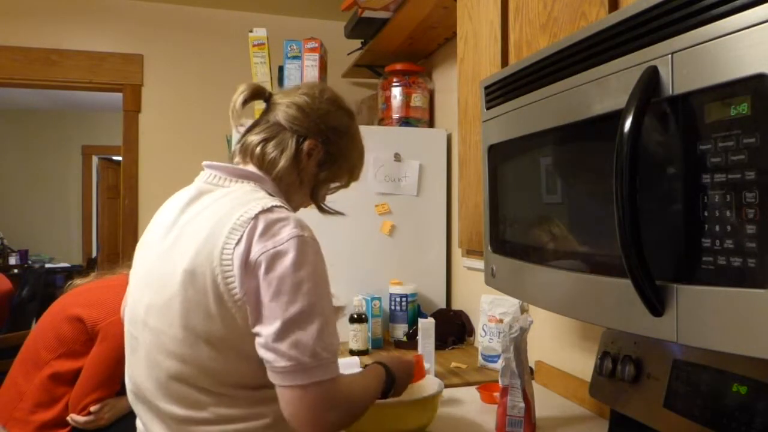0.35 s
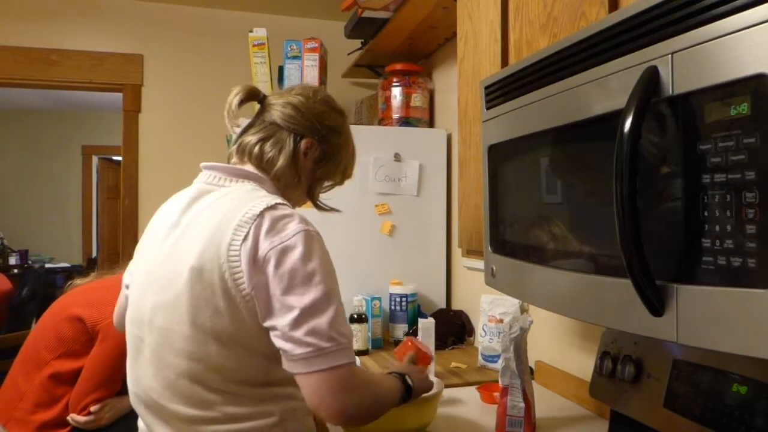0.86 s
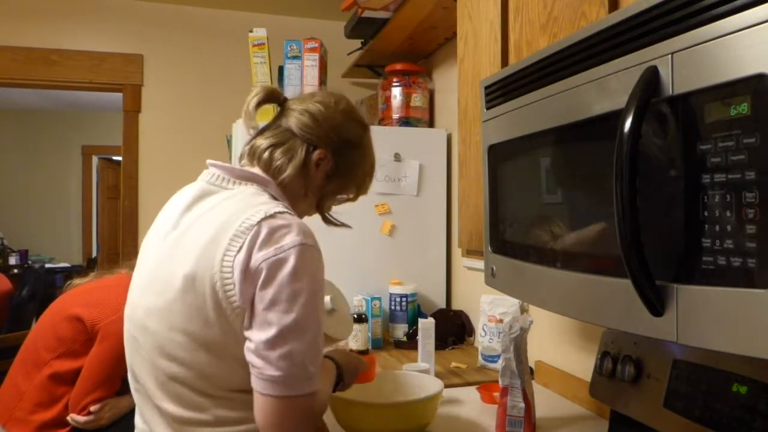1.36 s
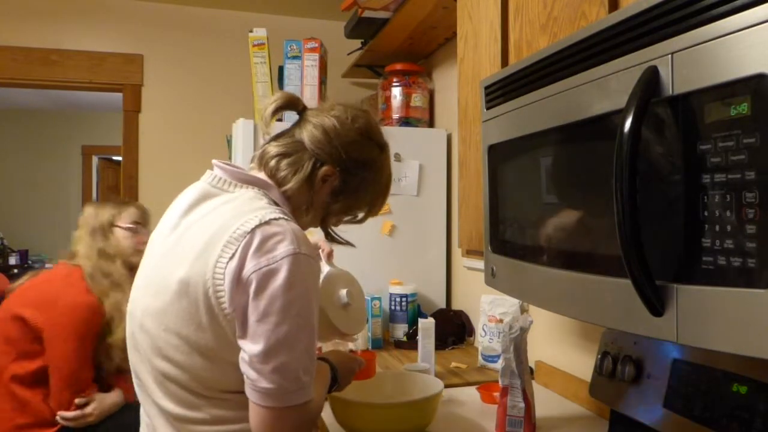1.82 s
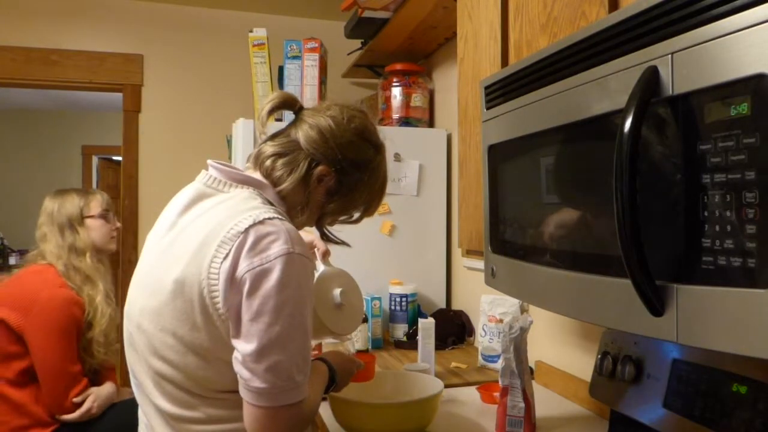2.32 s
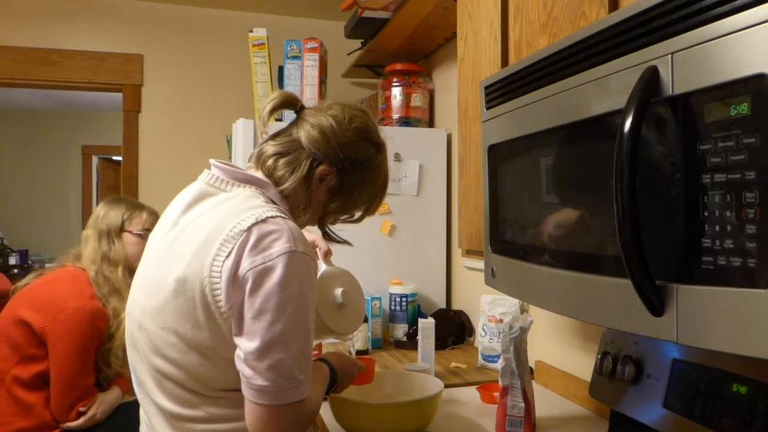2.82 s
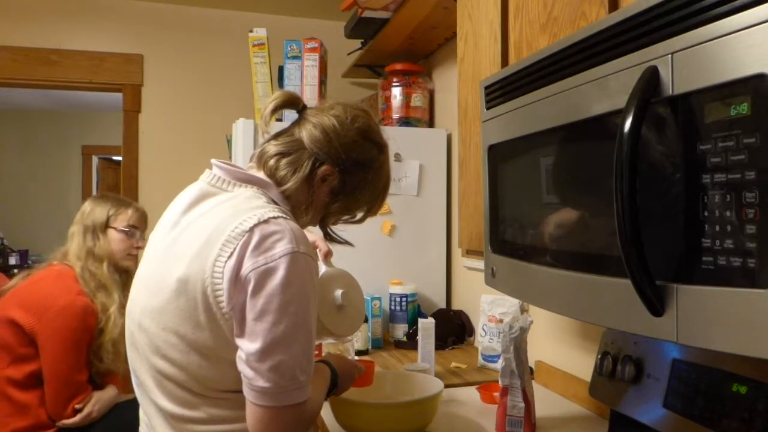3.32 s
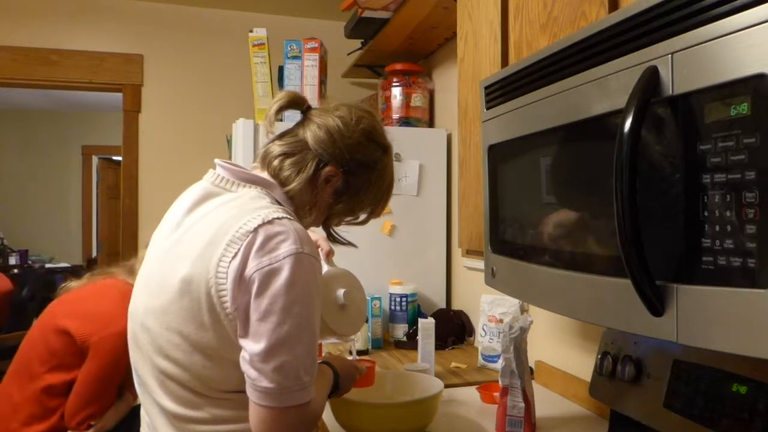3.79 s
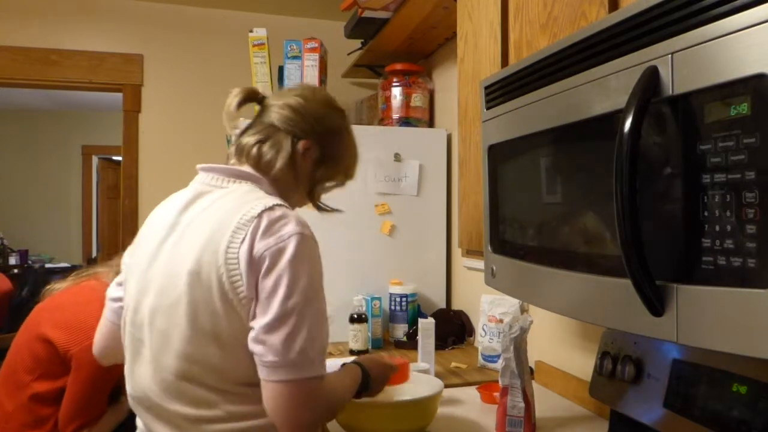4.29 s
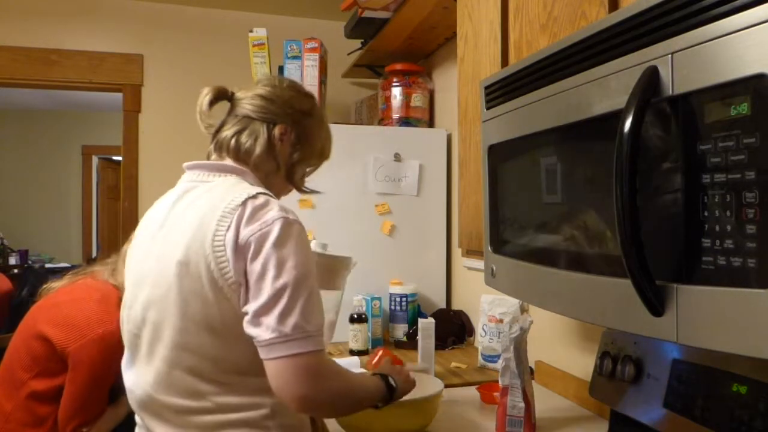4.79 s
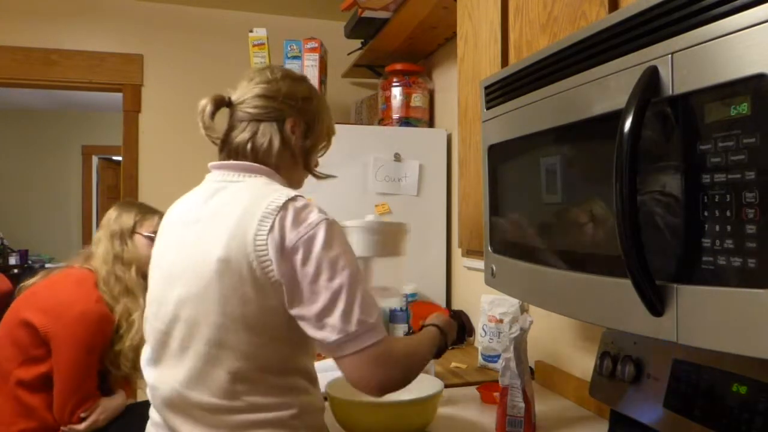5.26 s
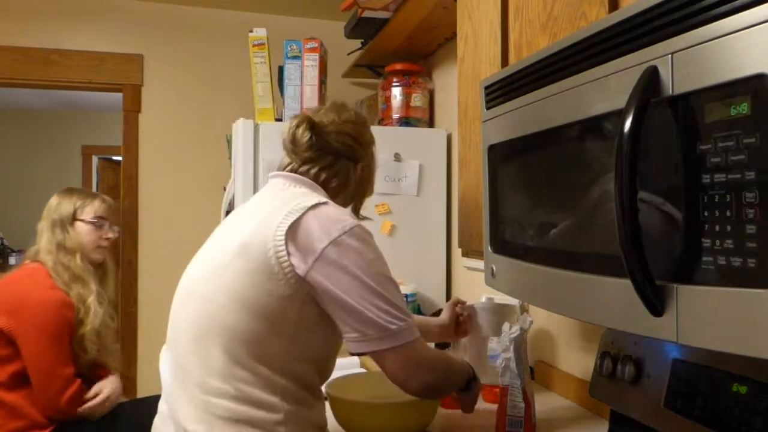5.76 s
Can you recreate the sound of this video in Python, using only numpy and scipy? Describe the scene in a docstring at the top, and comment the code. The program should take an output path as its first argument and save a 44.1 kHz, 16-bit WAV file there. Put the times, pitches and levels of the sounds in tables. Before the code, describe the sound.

Small, delicate water sounds close to the microphone in a small kitchen: bright tiny bubbles, fizzing drips, a little low slosh. A brief pour ends with quick hard cup taps, a thin trickle resumes among soft low thuds, and a second brief pour splashes brightly. After a near-quiet pause, hard hollow plastic clacks and a snap stand out as the loudest event, trailing rattle and a faint settling rumble.

```python
"""A thin trickle of water over a quiet kitchen's hush: from a plastic pitcher into a small cup, tipped twice into a bowl.
Water is crowds of chirping bubbles, fizzing spray, low slosh, splash bursts and breathy gurgles on gliding tones.
The counter thuds, the cup taps the bowl, the pitcher clacks into its stand, lid snapping: ringing modes plus rattle.
A dull rumble follows as the pitcher settles; sparse decaying echoes make the room."""
import sys
import numpy as np
from scipy import signal
from scipy.fft import rfft, irfft
from scipy.io import wavfile
from scipy.ndimage import uniform_filter1d

SR = 44100
rng = np.random.default_rng(int(sys.argv[2]) if len(sys.argv) > 2 else 0)


def to_wav(sig):
    """Store sig (one row per channel, or 1-D mono) as 16-bit WAV at the path in sys.argv[1].

    Samples outside -1..1 are clipped; the rate is SR.
    """
    pcm = np.clip(np.atleast_2d(sig), -1, 1) * 32767
    pcm = np.round(pcm).astype(np.int16)
    wavfile.write(sys.argv[1], SR, pcm.T)  # frames by channels


def gain_from_db(level_db):
    """Convert decibel levels to linear amplitude factors (20 dB per decade)."""
    decades = np.asarray(level_db, float) / 20
    return 10 ** decades


N = 270288

# kitchen hush, colour: pitch_hz, relative density_db (per Hz)
AIR_COLOUR = [(15, -40), (25, -28.5), (157, -23), (229, -15.5), (516, -6.5), (775, -8), (3920, -17.5),
              (6740, -25), (16000, -32)]
# left-right likeness of the hush: pitch_hz, correlation (-1 to 1)
AIR_LIKENESS = [(60, -0.17), (240, 0.88), (950, -0.14), (3770, -0.85), (15000, -0.37)]
# strength of the trickle: time_s, level_db
FLOW = [(0, -63.5), (1.0, -60), (1.5, -67), (1.97, -66.5), (2.25, -57.5), (2.5, -54), (2.7, -62.5),
        (3.2, -59.5), (3.95, -63.5), (5.2, -69), (5.5, -62), (6.13, -66.5)]
# surges of water landing: start_s, hold_s, level_db
SURGES = [(.49, 0.17, -57), (.615, 0.026, -52.5), (.70, 0.093, -51.5), (.766, 0.055, -46),
          (.848, 0.03, -45.5), (3.13, 0.0076, -53.5), (3.36, 0.016, -57), (3.65, 0.03, -55.5),
          (4.09, 0.012, -55.5), (4.556, 0.12, -50), (4.68, 0.12, -47.5), (4.797, 0.1, -45.5),
          (4.99, 0.067, -59), (6.04, 0.032, -54.5)]
# colour of the spray: pitch_hz, relative density_db (per Hz)
SPRAY_COLOUR = [(1180, -74), (2000, -11), (2740, -10.5), (6420, -7.5), (14200, -14), (16000, -23.5)]
# swells of the slosh in the vessels: start_s, hold_s, level_db
SLOSH_SWELLS = [(.77, 0.022, -47.5), (.92, 0.023, -52.5), (2.2, 0.061, -53), (2.55, 0.042, -56.5),
                (4.79, 0.066, -59), (5.02, 0.15, -59.5), (5.9, 0.081, -51.5)]
# colour of the slosh: pitch_hz, relative density_db (per Hz)
SLOSH_COLOUR = [(100, -11.5), (300, -12), (700, 5.5), (1500, -3.5), (3000, -12.5)]
# splashes, each a burst of bubbles: start_s, peak_db, pitch_hz
SPLASHES = [(0.0524, -35, 8260), (0.065, -37, 5800), (0.251, -36.5, 740), (0.6175, -32.5, 6150),
            (0.738, -35, 3520), (0.7683, -35.5, 9180), (0.783, -36.5, 7460), (0.8483, -33.5, 6080),
            (0.872, -37, 5540), (1.734, -50.5, 2020), (1.917, -44, 4500), (2.12, -42, 14800),
            (2.1814, -40, 6680), (2.209, -42, 11700), (2.37, -45, 6140), (2.405, -38.5, 6570),
            (2.533, -36.5, 3620), (2.6384, -45, 7400), (2.974, -44, 10900), (3.1306, -45.5, 4860),
            (3.1734, -40.5, 4310), (3.5745, -40.5, 5930), (3.9893, -49.5, 7540), (4.114, -44, 7840),
            (4.312, -42.5, 14750), (4.542, -33, 10900), (4.559, -41, 4370), (4.657, -35.5, 10400),
            (4.6927, -28.5, 6500), (4.706, -31.5, 7370), (4.762, -38, 6330), (4.79, -32.5, 3450),
            (4.802, -33, 2196), (4.823, -29.5, 5200), (4.912, -38, 3920), (4.993, -45.5, 4680)]
# singing hollows dug by the jet: start_s, length_s, midway level_db, first_hz, last_hz
GURGLES = [(0.487, 0.14, -52, 6600, 5090), (2.753, 0.16, -59.5, 2765, 2338),
           (4.656, 0.101, -49.5, 1450, 1750), (4.829, 0.059, -48, 1527, 1528)]
# blows on the counter: start_s, peak_db, ring_over_rattle_db
THUDS = [(0.745, -40.5, 4), (2.014, -38.5, 3), (2.446, -37, 5), (2.9105, -33.5, -5), (2.9155, -25, -8.5),
         (2.939, -34, -31), (2.956, -37.5, -17), (3.365, -44.5, -3.5), (5.461, -34.5, -25)]
# modes of the counter: pitch_hz, relative level_db, t60_s
COUNTER_MODES = [(309.5, -12.5, 0.13), (457, 3.5, 0.07)]
# colour of the counter's rattle: pitch_hz, relative density_db (per Hz)
COUNTER_RATTLE = [(88, -61.5), (150, -24.5), (805, -3.5), (1630, -15), (2400, -25), (3840, -21),
                  (16000, -33.5)]
# cup against bowl: start_s, peak_db, ring_over_rattle_db
CUP_TAPS = [(0.962, -30.5, -3), (1.0655, -16, 1.5), (1.0805, -24, 7), (1.088, -24, 9)]
# modes of the cup: pitch_hz, relative level_db, t60_s
CUP_MODES = [(890, -11, 0.029), (1250, -5.5, 0.022), (1490, -1.5, 0.026), (1987, -5, 0.055),
             (2224, -3, 0.026)]
# colour of the cup's rattle: pitch_hz, relative density_db (per Hz)
CUP_RATTLE = [(180, -62), (450, -30), (870, -7.5), (2000, -3.5), (2610, -24.5), (3900, -23.5), (5000, -49),
              (6400, -30), (12700, -17.5), (16000, -31)]
# strength of the ringing air in the filling cup: time_s, level_db
FILLING = [(2.0, -65.5), (2.4, -65.5), (2.9, -61), (3.6, -89)]
# resonances of the air in the cup: pitch_hz, width_hz, relative level_db
CUP_AIR = [(3450, 270, 2.5), (4500, 98, -1.5), (6150, 440, -0.5)]
# pitcher against its stand: start_s, peak_db, ring_over_rattle_db
CLACKS = [(5.742, -22.5, -8), (5.7705, -7.5, 2), (5.7765, -9, 3), (5.794, -28, 4), (5.9965, -35, -13)]
# modes of the pitcher: pitch_hz, relative level_db, t60_s
PITCHER_MODES = [(1043, -12.5, 0.38), (1520, -1, 0.076), (2716, 2, 0.1), (3270, 11, 0.059),
                 (3665, 8.5, 0.03), (6130, -0.5, 0.043)]
# colour of the pitcher's rattle: pitch_hz, relative density_db (per Hz)
PITCHER_RATTLE = [(130, -38), (560, -1.5), (1020, -14), (1530, -3), (1760, -13.5), (3400, 1), (4410, -9.5),
                  (6510, -9), (16000, -22)]
# snaps of the lid: start_s, peak_db, ring_over_rattle_db
LID_SNAPS = [(5.76, -15.5, 1), (5.88, -13.5, 9)]
# the lid's one short mode: pitch_hz, relative level_db, t60_s
LID_MODES = [(3530, 0, .011)]
# colour of the lid's rattle: pitch_hz, relative density_db (per Hz)
LID_RATTLE = [(200, -16), (800, -3.5), (3400, -11), (5000, -11.5), (16000, -10.5)]
# rumble of the settling pitcher: start_s, hold_s, level_db
RUMBLES = [(6.01, .12, -58.5)]
# decay of the room: pitch_hz, t60_s
KITCHEN_DECAY = [(300, 0.18), (12000, 0.19)]

SLOSH_RISE_S, SLOSH_DRAIN_S = 0.0082, 0.051  # the rumble shares them


def evened(x):
    """Scales to rms 1."""
    return x / np.sqrt(np.mean(x ** 2) + 1e-20)


def read(points, hz):
    """Reads a table on a log-frequency axis."""
    f, value = np.transpose(points)
    return np.interp(np.log(hz + 1), np.log(f + 1), value)


def curve(rows):
    """Gain at every sample from a table of times and levels; -120 dB outside it."""
    s, db = np.transpose(rows)
    return gain_from_db(np.interp(np.arange(N) / SR, s, db, -120, -120))


def add(mix, s, sound):
    """Mixes a sound in at time s."""
    part = mix[round(s * SR):][:len(sound)]
    part += sound[:len(part)]


def coloured(x, points):
    """Filters x by the spectrum of a table."""
    gain = gain_from_db(read(points, np.fft.rfftfreq(len(x), 1 / SR)))
    return irfft(rfft(x) * gain, len(x))


def smeared(x, bands, frames):
    """Smooths random values over pitch and time into patches of rms 1."""
    x = uniform_filter1d(x, size=bands, axis=0)
    return evened(uniform_filter1d(x, size=frames, axis=1))


def patchy(patch_db, flicker_db):
    """Noise whose loudness varies in short patches of pitch and time, and flickers over wide bands."""
    a, b, patches, wide = rng.standard_normal((N // 64 + 5, 129, 4)).T
    level_db = patch_db * smeared(patches, 4, 18) + flicker_db * smeared(wide, 50, 12)
    z = (a + 1j * b) * gain_from_db(level_db)
    return evened(signal.istft(z, nperseg=256, noverlap=192)[1][:N])


def swells(rows, rise_s, drain_s):
    """Power of events that rise, hold and drain away."""
    t, power = np.arange(SR) / SR, np.zeros(N)
    for s, hold_s, db in rows:
        drain = np.exp(-np.maximum(t - rise_s - hold_s, 0) / drain_s)
        shape = np.minimum(t / rise_s, 1) * drain
        add(power, s, (gain_from_db(db) * shape) ** 2)
    return power


def chirp(hz, t60, rise, attack):
    """A bubble rings as a dying sine whose pitch climbs as it nears the surface."""
    t = np.arange(round(t60 * SR) + 20) / SR
    envelope = (1 - np.exp(-t / attack)) * gain_from_db(-60 * t / t60)
    return envelope * np.sin(2 * np.pi * hz * (t + rise * t ** 2 / t60))


def blows(rows, modes, rattle, rattle_t60, push):
    """Each blow is a short rough push that rings the modes and leaves a dying rattle."""
    out, t = np.zeros(N), np.arange(SR // 4) / SR
    split = 0.035  # uneven walls split every mode into close neighbours, this share apart
    for s, db, ring_db in rows:
        ring = np.zeros(len(t))
        for hz, level, t60 in modes:
            for apart in (-1, 0, 1.3):
                phase = hz * (1 + split * apart) * t + rng.random()
                ring += gain_from_db(level - 60 * t / t60) * np.sin(2 * np.pi * phase)
        rough = coloured(rng.standard_normal(len(t)), rattle) * gain_from_db(-60 * t / rattle_t60)
        sound = (gain_from_db(ring_db) * evened(ring) + evened(rough)) * (1 - np.exp(-t / push))
        add(out, s, gain_from_db(db) * sound / abs(sound).max())
    return out


def air():
    """Steady stereo hush of shaped noise with drifting patches."""
    level_db, patch_db = -57.5, 3.1
    hz = np.fft.rfftfreq(1024, 1 / SR)
    a, b, c, d, patches = rng.standard_normal((N // 256 + 5, 513, 5)).T
    same = np.clip(read(AIR_LIKENESS, hz), -1, 1)[:, None]
    left = a + 1j * b
    right = same * left + np.sqrt(1 - same ** 2) * (c + 1j * d)
    z = np.array([left, right])
    z *= gain_from_db(read(AIR_COLOUR, hz)[:, None] + patch_db * smeared(patches, 10, 10))
    return gain_from_db(level_db) * evened(signal.istft(z, nperseg=1024, noverlap=768)[1][:, :N])


def bubble_crowd():
    """Tiny bubbles at 24 pitches ring at random moments, with uneven sizes."""
    crowd = np.zeros(N)
    for hz in np.geomspace(2800, 14000, 24):
        born = rng.random(N) < 32 / SR  # 32 a second at each pitch
        size = gain_from_db(4.0 * np.minimum(rng.exponential(1, N), 4)) * born
        bubble = evened(chirp(hz, 60 / hz + 0.015, 0.071, 0.0015))
        add(crowd, 0, signal.oaconvolve(size, bubble))
    return evened(crowd)


def spatter():
    """Each landing drop throws a sudden bright hiss."""
    drops = np.minimum(rng.exponential(1, N), 1.8) * (rng.random(N) < 260 / SR)  # 260 a second
    envelope = signal.lfilter([1], [1, -np.exp(-1 / (0.0025 * SR))], drops)
    return evened(envelope * np.diff(rng.standard_normal(N + 1)))


def spray():
    """Bubbles, spatter and patchy fizz follow the trickle and its surges."""
    flow = np.sqrt(curve(FLOW) ** 2 + swells(SURGES, 0.0012, 0.027))  # rise s, drain s
    fizz = bubble_crowd() * gain_from_db(-8.5) + spatter() * gain_from_db(-5.0) + patchy(6, 2.65)
    return flow * evened(coloured(fizz, SPRAY_COLOUR))


def slosh():
    """Low patchy noise in the vessels: a steady part under the flow, and swells."""
    under_flow = gain_from_db(-2.5) * curve(FLOW)
    heave = np.sqrt(under_flow ** 2 + swells(SLOSH_SWELLS, SLOSH_RISE_S, SLOSH_DRAIN_S))
    return heave * evened(coloured(patchy(2.8, 2.2), SLOSH_COLOUR))


def splashes(count=7):
    """A drop lands and frees a handful of bubbles of neighbouring sizes within a few milliseconds."""
    out = np.zeros(N)
    for s, db, hz in SPLASHES:
        burst = np.zeros(SR // 4)
        spread = 0.07 + 0.005 * max(db + 46, 0)  # harder splashes free more unlike bubbles
        fine = min(hz / 3000, 1)  # a big low bubble forms whole; small ones scatter in size and time
        for k, (apart, late, size) in enumerate(rng.uniform(-1.1, 1, (count, 3))):
            place = 2 * (k + .5 + apart / 2) / count - 1
            pitch_hz = hz * (1 + fine * spread * place)
            strength = (size + np.sign(size + 1 - fine)) * gain_from_db(-9 * abs(late))
            bubble = chirp(pitch_hz, 18 / pitch_hz + .02, 0.033, 3 / hz)  # big bubbles ring longer
            add(burst, 0.026 * fine * late ** 4, strength * bubble)
        burst /= abs(burst).max()
        tick = np.diff(rng.standard_normal(201)) * np.exp(-np.arange(200) / 45)  # of the impact
        add(burst, 0, gain_from_db(-17) * tick)
        add(out, s, gain_from_db(db) * burst)
    return out


def gurgles(share=0.14):
    """The jet's hollow sings as it changes size: slow noise on a gliding tone, wider when higher, loudest midway."""
    out, ends_db = np.zeros(N), -12.5
    for s, length, db, first_hz, last_hz in GURGLES:
        way = np.linspace(0, 1, round(length * SR))
        hz = first_hz + (last_hz - first_hz) * way
        width_hz = share * hz.mean() * np.sqrt(hz.mean() / 4000)
        keep = np.exp(-np.pi * width_hz / SR)
        noise = rng.standard_normal((len(hz), 2)) @ [1, 1j]
        wobble = signal.lfilter([1], np.poly([keep, keep]), noise)
        band = evened((wobble * np.exp(2j * np.pi * np.cumsum(hz) / SR)).real)
        arch = gain_from_db(db + ends_db * (2 * way - 1) ** 2)
        add(out, s, arch * band * signal.windows.tukey(len(hz), .2))
    return out


def counter_thuds():
    """Soft pushes ring the counter's low modes."""
    return blows(THUDS, COUNTER_MODES, COUNTER_RATTLE, rattle_t60=0.046, push=0.0039)


def cup_taps():
    """The cup taps the bowl: hard pushes, short rings."""
    return blows(CUP_TAPS, CUP_MODES, CUP_RATTLE, rattle_t60=0.059, push=0.00036)


def cup_air():
    """The trickle's patter rings the resonances of the air in the cup."""
    patter, t = patchy(5.7, 0.33), np.arange(SR // 20) / SR
    ring = np.zeros(N)
    for hz, width, db in CUP_AIR:
        resonance = np.exp(-np.pi * width * t) * np.sin(2 * np.pi * hz * t)
        ring += gain_from_db(db) * evened(signal.oaconvolve(patter, resonance)[:N])
    return curve(FILLING) * ring


def pitcher_clacks():
    """The pitcher clacks into its stand: very hard pushes, bright modes and a long rattle."""
    return blows(CLACKS, PITCHER_MODES, PITCHER_RATTLE, rattle_t60=0.11, push=0.00022)


def lid_snaps():
    """The lid snaps: one short mode over a rattle."""
    return blows(LID_SNAPS, LID_MODES, LID_RATTLE, rattle_t60=0.088, push=0.001)


def rumble():
    """Low lumpy noise under the settling pitcher."""
    low_band = signal.butter(2, (157, 517), "band", fs=SR, output="sos")  # Hz
    lumps = evened(signal.sosfilt(low_band, patchy(1.2, 0.8)))
    return np.sqrt(swells(RUMBLES, SLOSH_RISE_S, SLOSH_DRAIN_S)) * lumps


def kitchen(x):
    """Sparse echoes of random sign, each band dying at its own speed, other echoes for each ear."""
    taps = np.zeros((2, SR // 2))
    slots = np.arange(160, SR // 2 - 20, 20)  # one echo in every 20 samples
    at = slots + rng.integers(0, 20, (2, len(slots)))
    np.put_along_axis(taps, at, rng.choice([-1., 1.], at.shape), 1)
    hz, t, z = signal.stft(taps, SR, nperseg=256)
    decay = gain_from_db(-60 * t / read(KITCHEN_DECAY, hz)[:, None])
    tail = signal.istft(z * decay, SR, nperseg=256)[1]
    tail += 0.46 * uniform_filter1d(tail[::-1], size=5, axis=1)  # the ears share the longer waves
    return signal.fftconvolve(x[None], tail / np.linalg.norm(tail[0]), axes=1)[:, :N]


def scene():
    """Water and blows near the counter, the room behind them, the hush under all."""
    water = spray() + slosh() + splashes() + gurgles() + cup_air()
    bodies = counter_thuds() + cup_taps() + pitcher_clacks() + lid_snaps() + rumble()
    no_bass = signal.butter(2, 170, "high", fs=SR, output="sos")  # nothing below 170 Hz reaches the near sounds
    near = signal.sosfilt(no_bass, water + bodies)
    direct = near * gain_from_db([[-1.5], [-1.2]])  # left, right dB
    return direct + gain_from_db(-6.5) * kitchen(near) + air()


def top_cut(x):
    """Nothing passes above the cut-off."""
    return signal.sosfilt(signal.butter(12, 16500, fs=SR, output="sos"), x)


def record(dry):
    """The camera's band limit: a steep low-pass at 15800 Hz closes off the top."""
    edge = signal.firwin(511, 15800, window=("kaiser", 9), fs=SR)
    mix = signal.oaconvolve(dry, edge[None], "same")
    return top_cut(mix)


dry = scene()
out = record(dry)
to_wav(out)
```